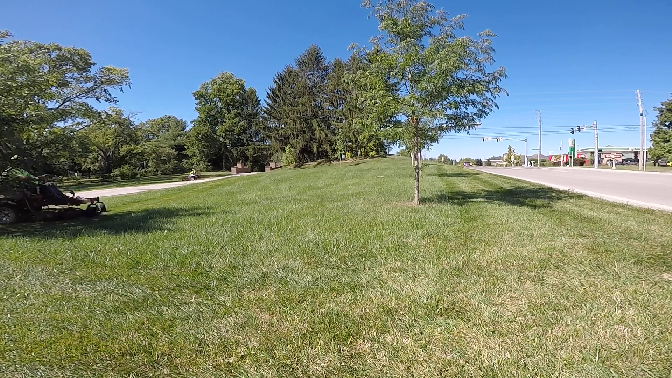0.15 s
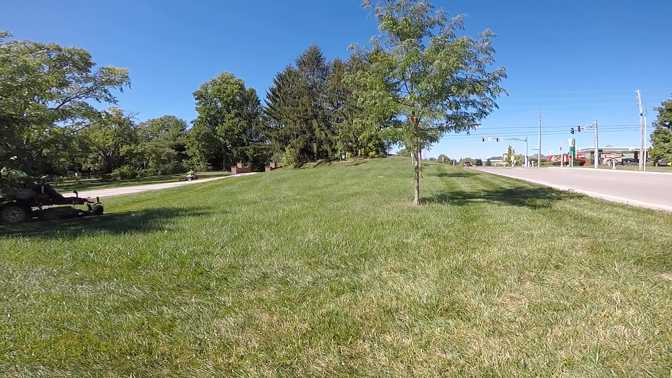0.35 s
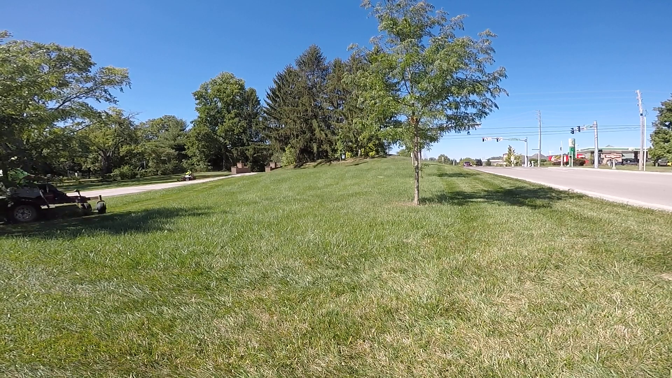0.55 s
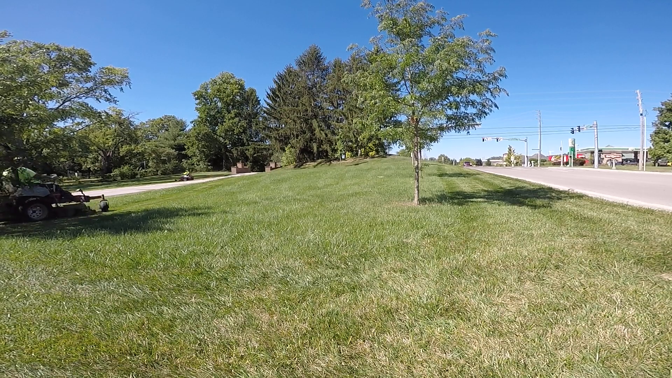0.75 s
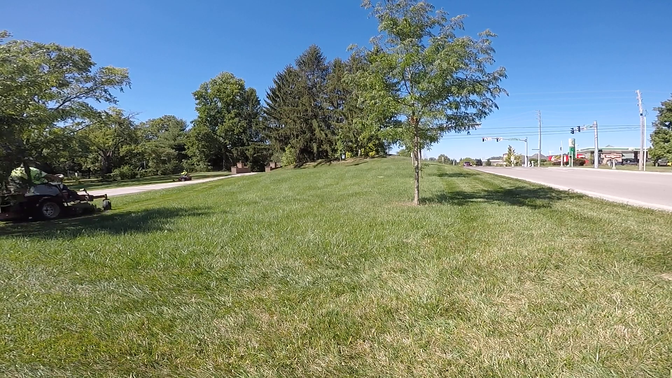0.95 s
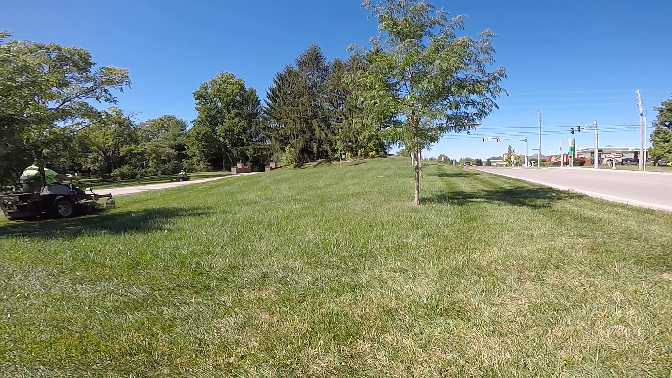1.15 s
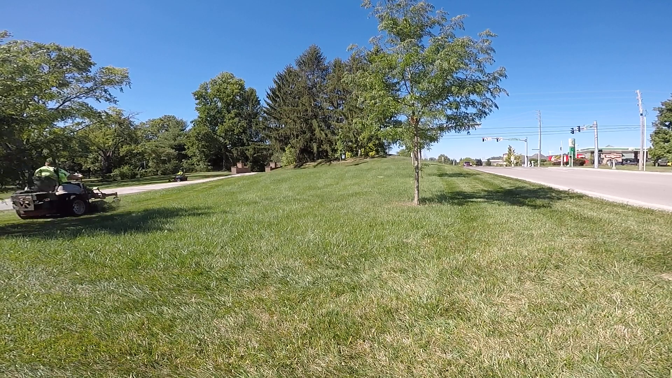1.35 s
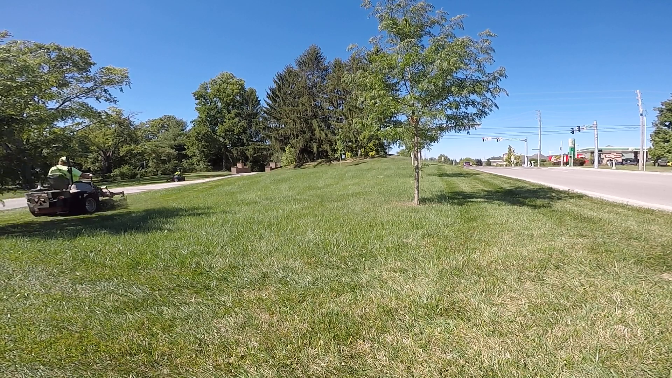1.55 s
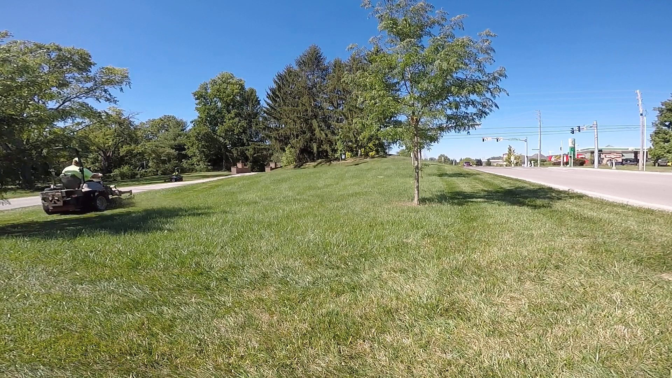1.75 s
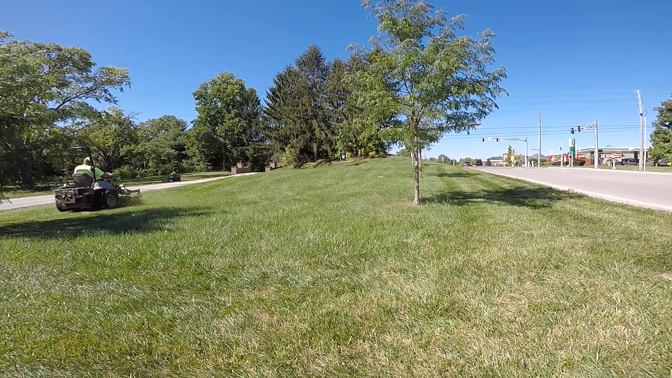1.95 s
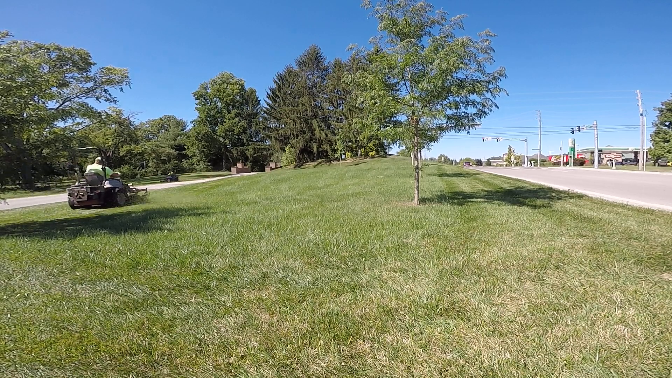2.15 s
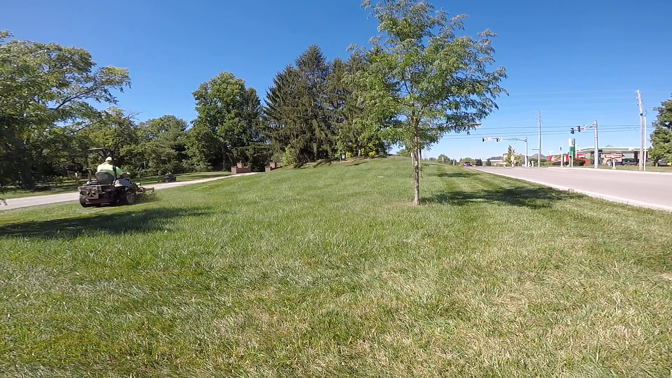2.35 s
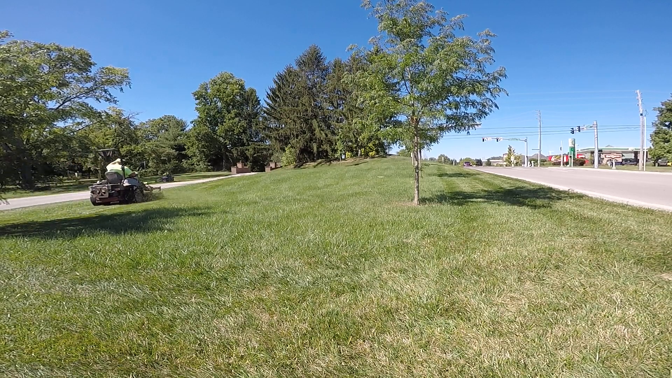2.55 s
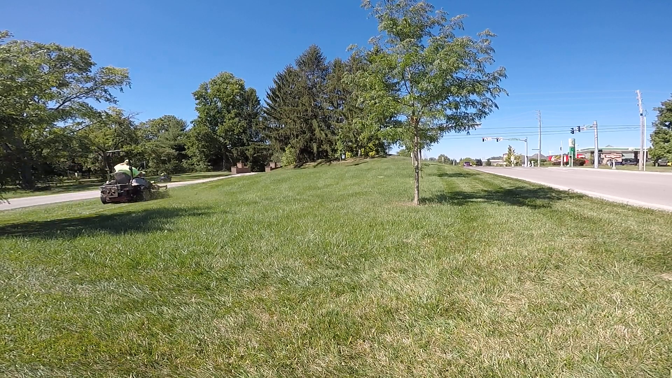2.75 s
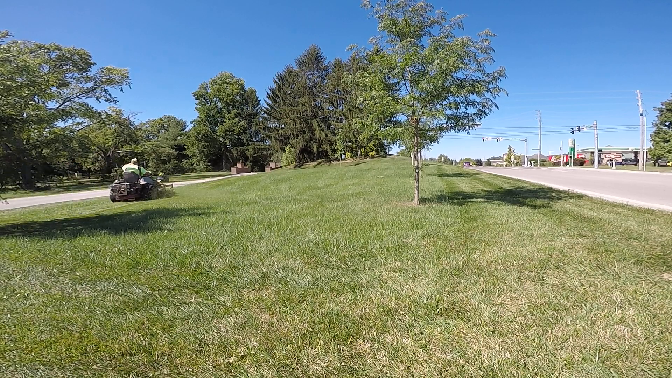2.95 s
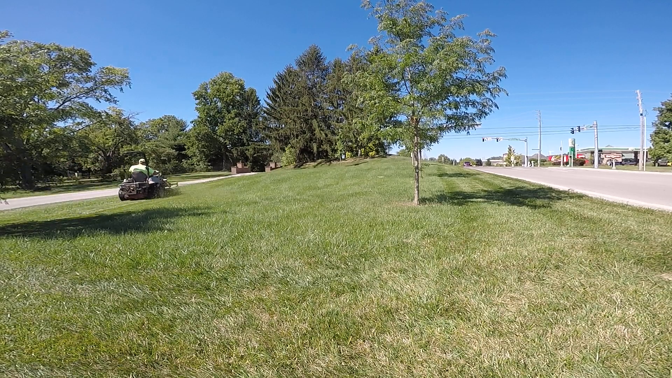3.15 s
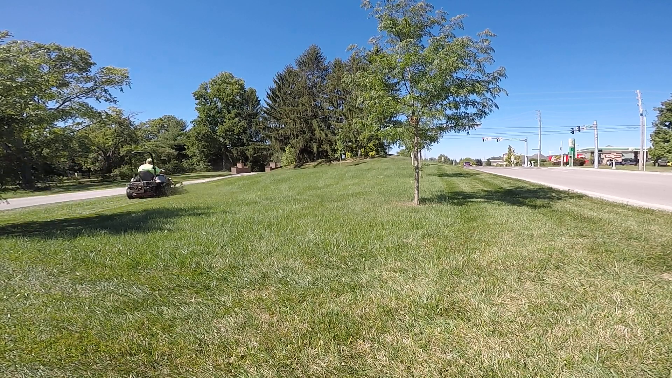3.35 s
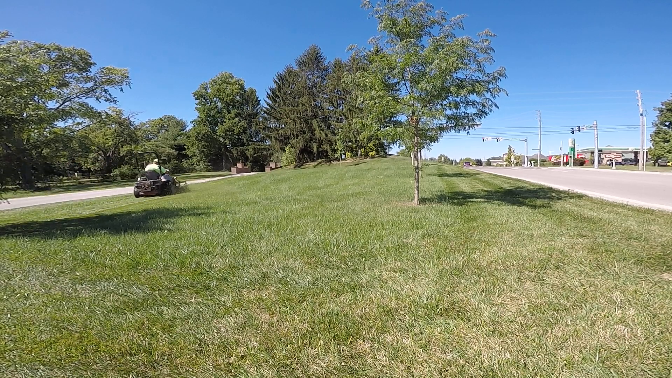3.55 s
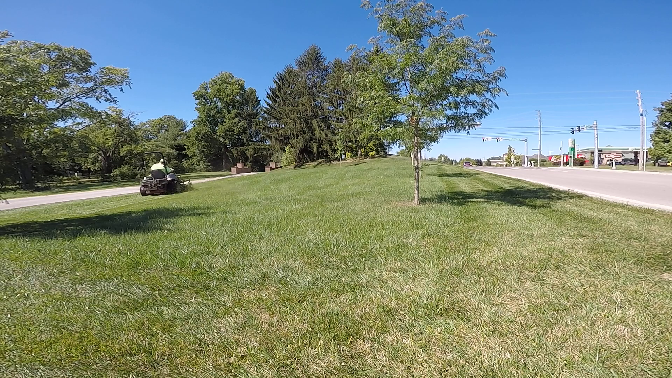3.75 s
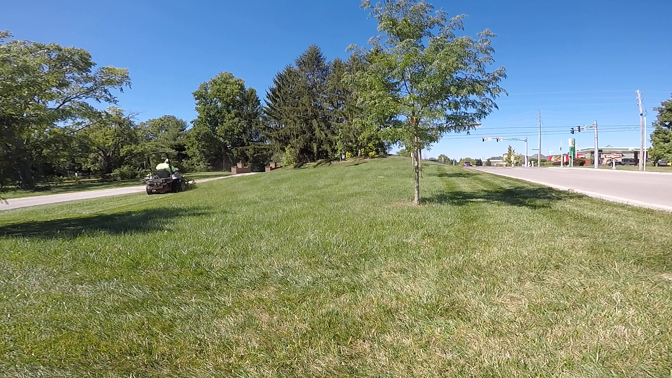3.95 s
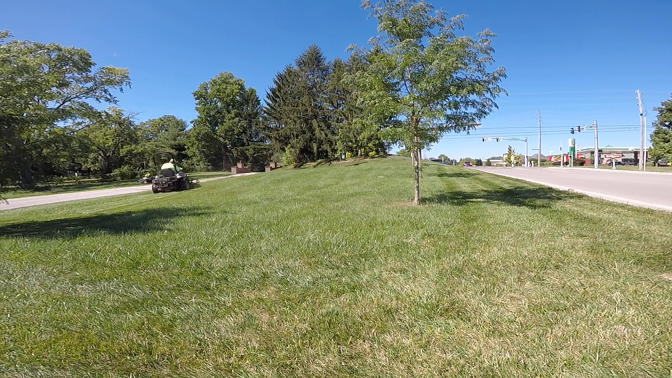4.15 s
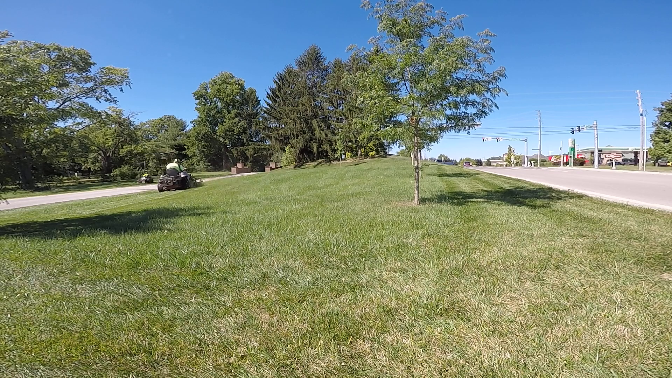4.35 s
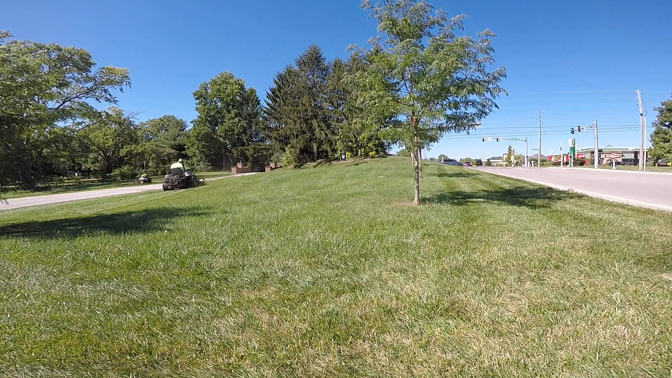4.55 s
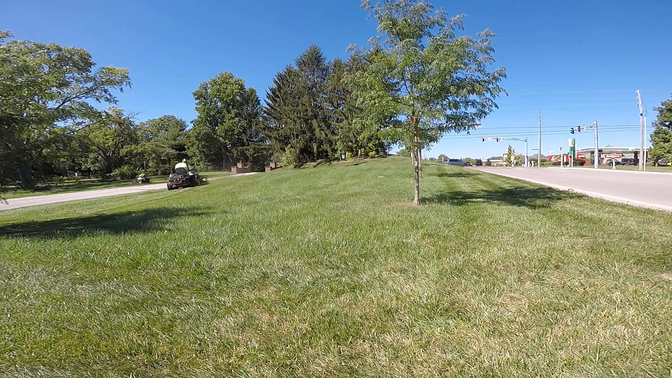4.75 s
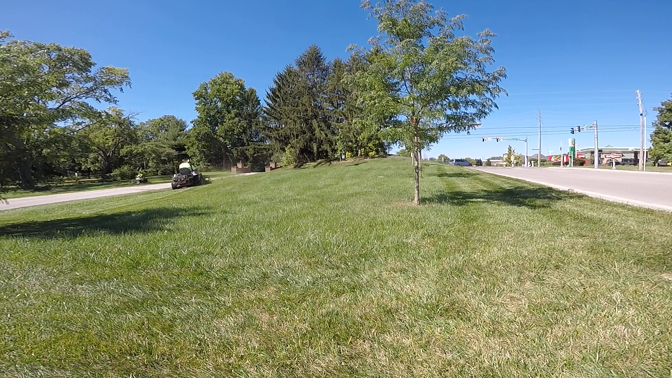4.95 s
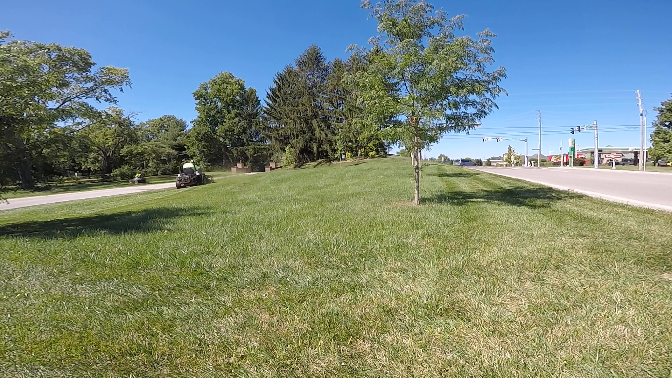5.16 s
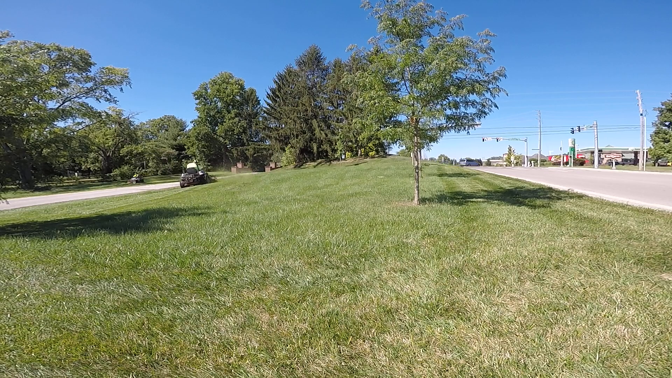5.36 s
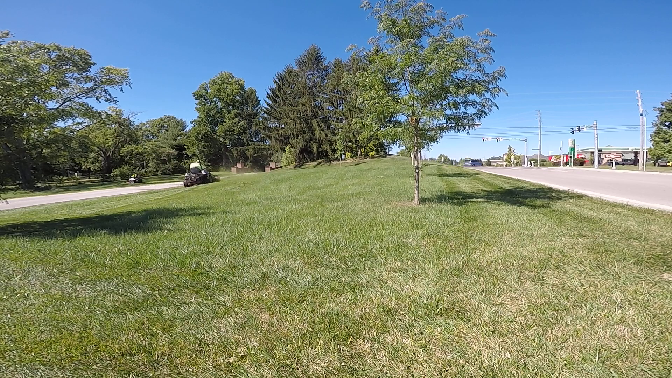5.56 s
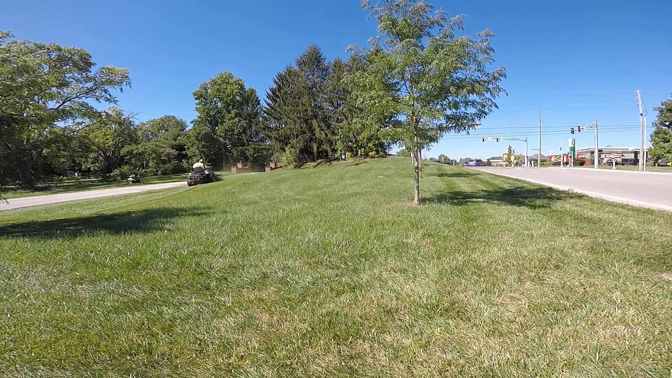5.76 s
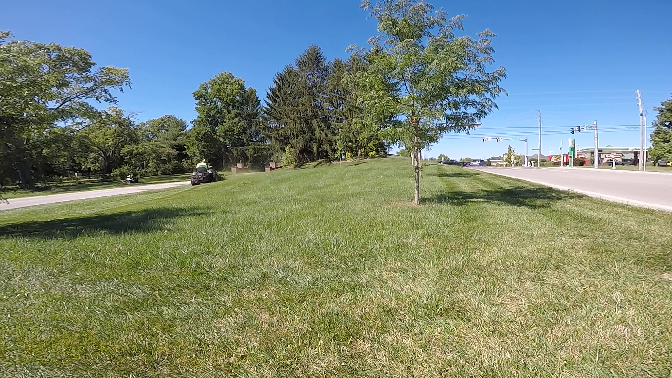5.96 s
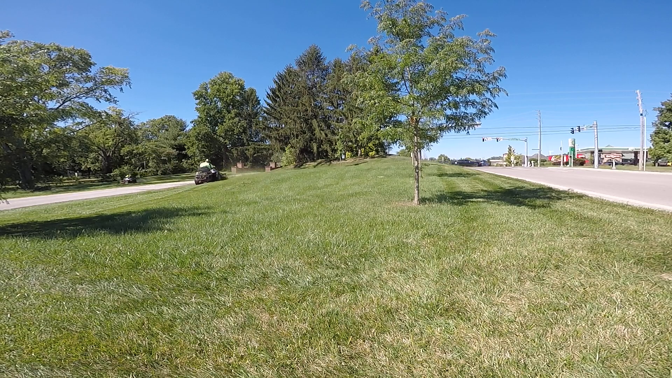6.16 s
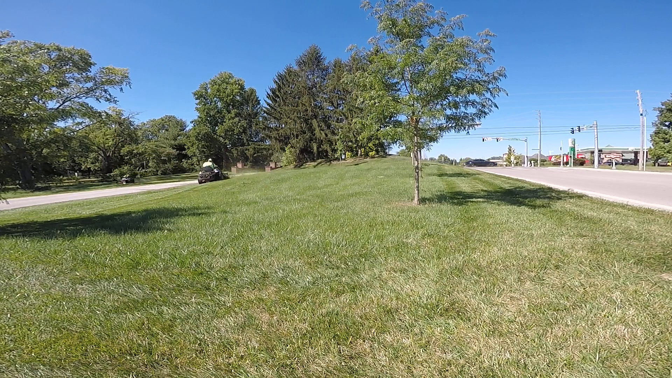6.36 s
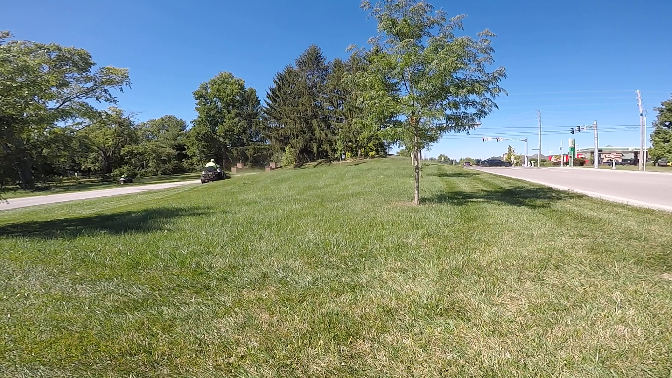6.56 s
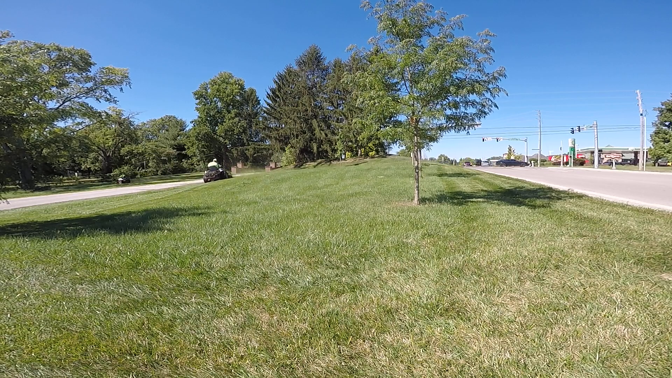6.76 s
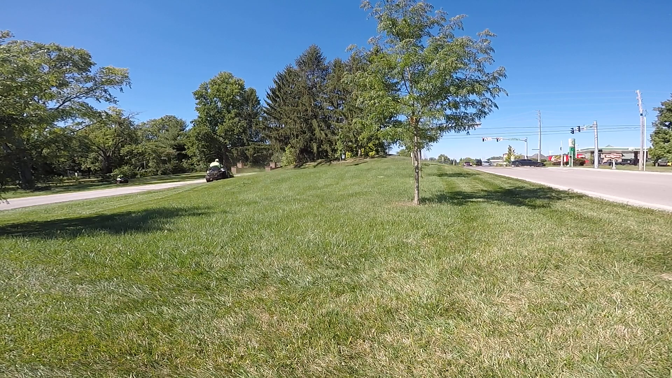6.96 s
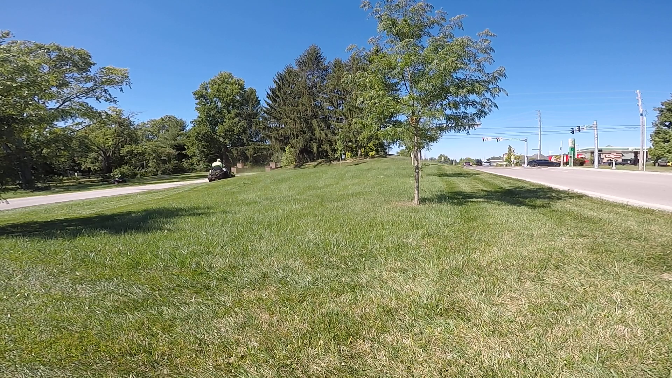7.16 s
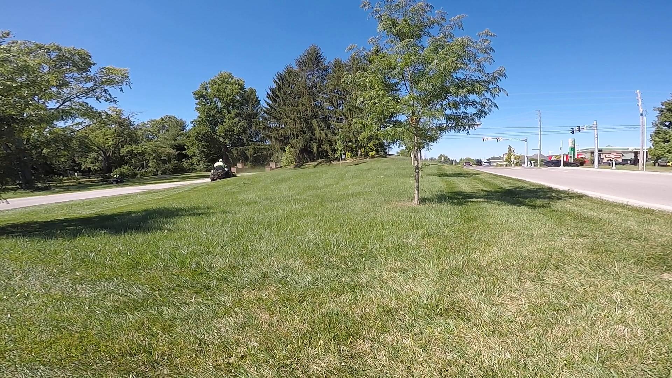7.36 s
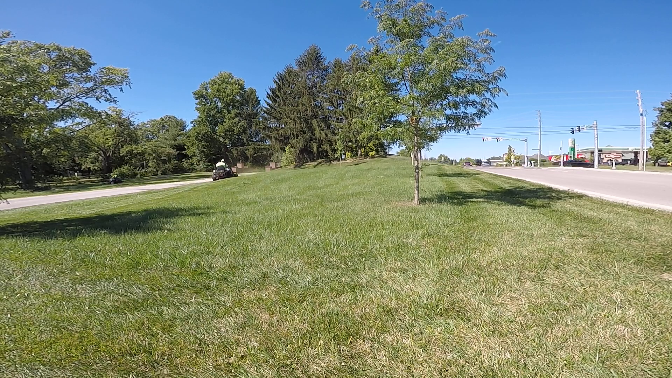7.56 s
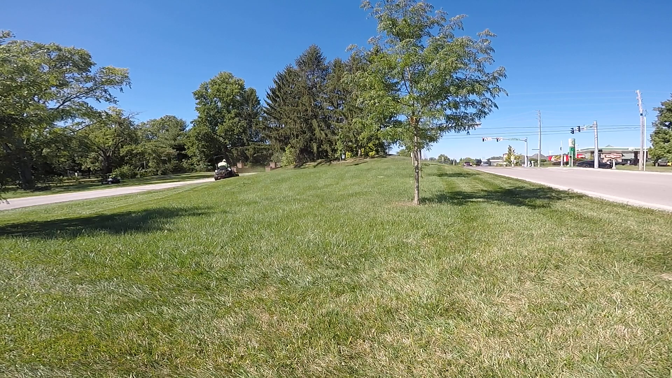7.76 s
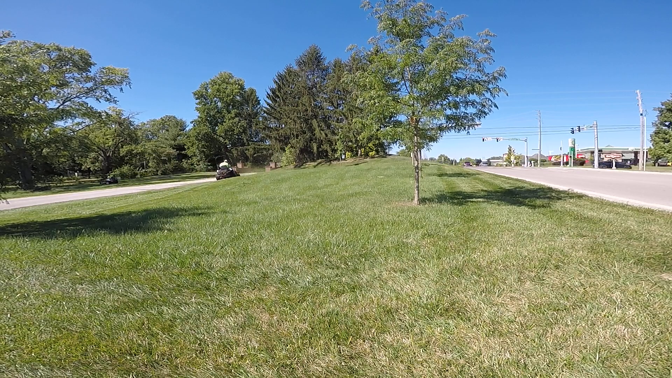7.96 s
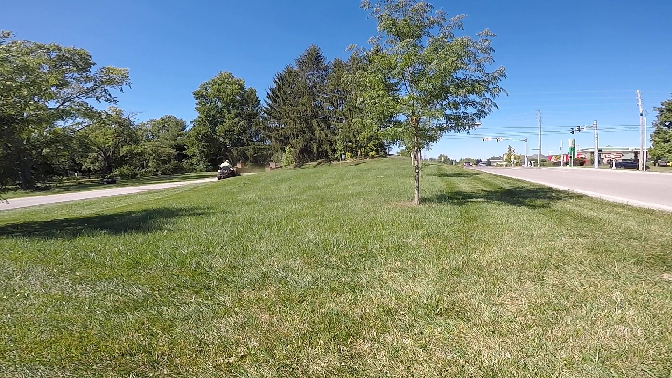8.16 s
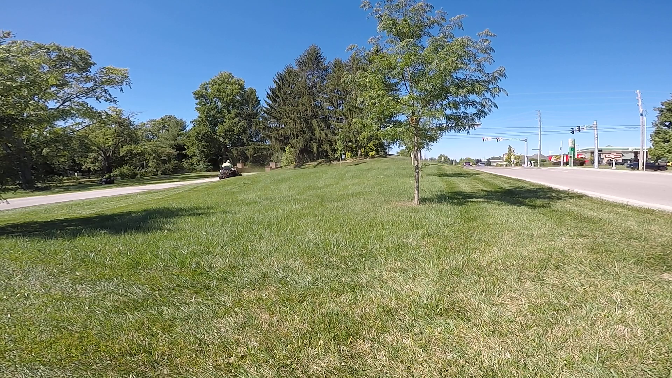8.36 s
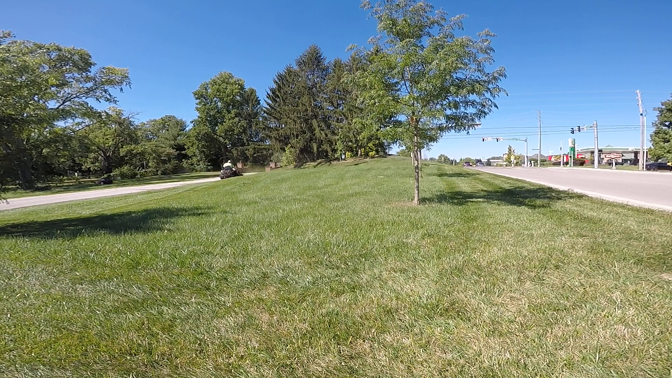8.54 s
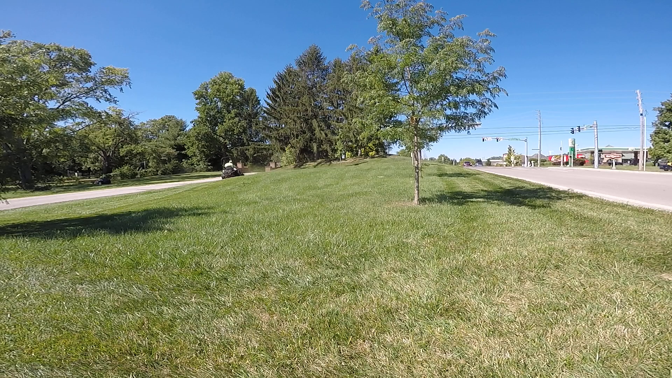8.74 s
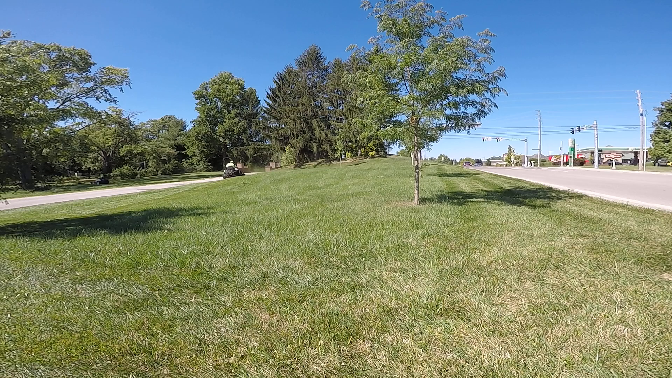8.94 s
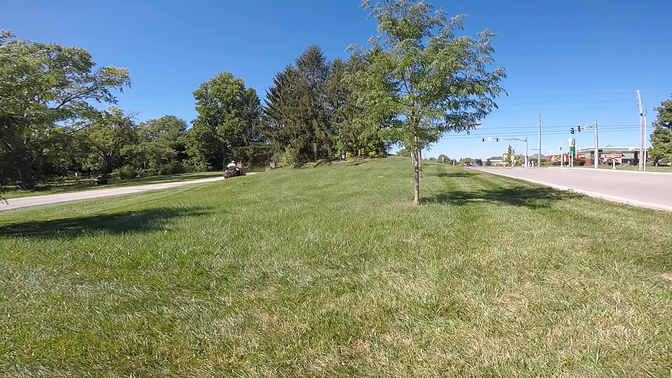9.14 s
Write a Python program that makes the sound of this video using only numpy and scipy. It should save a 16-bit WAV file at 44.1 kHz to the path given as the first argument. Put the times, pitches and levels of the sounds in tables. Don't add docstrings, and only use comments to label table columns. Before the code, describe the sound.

Low twin-cylinder mower drone and blade whirr swing away outdoors, gritty exhaust puffs rising then fading, with wind thumps and another mower's wavering hum behind.

```python
import sys
import numpy as np
from scipy import signal
from scipy.io import wavfile
from scipy.ndimage import uniform_filter1d

SR = 44100
rng = np.random.default_rng(int(sys.argv[2]) if len(sys.argv) > 2 else 0)


def inscribe(sig):
    pcm = np.round(np.clip(np.atleast_2d(sig).T, -1, 1) * 32767)
    wavfile.write(sys.argv[1], SR, pcm.astype(np.int16))


def level_to_linear(level):
    exponent = np.asarray(level, float) / 20
    return 10 ** exponent


N = 405719
TIME = np.arange(N) / SR
HZ = np.fft.rfftfreq(1024, 1 / SR)[:, None]
FRAMES = np.arange(-(-N // 256) + 1) * 256 / SR

# (time [s], speed [engine cycles/s, each two crank turns])
NEAR_SPEED = [(0.0, 26.646), (0.75, 27.599), (0.99, 27.117), (1.49, 25.492), (1.99, 25.391), (2.74, 26.468),
              (3.48, 26.01), (3.98, 25.465), (4.23, 25.663), (5.22, 25.561), (6.71, 26.253), (7.71, 26.313),
              (8.45, 26.778), (9.2, 26.93)]


def engine_cycles(speed):
    return np.cumsum(np.interp(TIME, *np.transpose(speed))) / SR


CYCLES = engine_cycles(NEAR_SPEED)

# (time [s], level [dB])
ENGINE = [(0, -24.5), (1.1, -26.5), (1.7, -20), (2.8, -22), (3.8, -20.5), (5.9, -21), (6.5, -24.5),
          (8.6, -25), (9.2, -29)]
# (engine order [number], level against order 5 [dB])
OTHER_ORDERS = [(1, -30), (4, -14), (6, -6.5), (7, -8.5), (8, -15), (9, -14), (10, -17.5), (11, -18),
                (12, -23.5), (13, -36)]
TURN_S, TURN_LENGTH_S = 1.4, 0.4
THIRD_DB, THIRD_SHADE_DB = -7.5, -3
SECOND_DB, SECOND_FADE_DB_PER_S = -22.5, 0.76


def engine():
    fifth_db = curves(ENGINE, TIME)[0]
    shaded = np.clip(1 - (TIME - TURN_S) / TURN_LENGTH_S, 0, 1)
    second_db = SECOND_DB - SECOND_FADE_DB_PER_S * TIME
    third_db = fifth_db + THIRD_DB + THIRD_SHADE_DB * shaded
    orders, db = np.transpose(OTHER_ORDERS)
    rest = [fifth_db + d - 0.12 * (k - 5) * (TIME - 4) for k, d in zip(orders, db)]
    levels = [second_db, third_db, fifth_db] + rest
    return tones(CYCLES, [2, 3, 5, *orders.round()], levels, waver_db=0.6, wobble=0.06)


# (multiple of blade pass [number], first spindle [dB], share of the others [ratio],
# lag of the second [turns], lag of the third [turns])
BLADES = [(1, -22, 1.33, 0.45, 0.16), (2, -22, 0.88, 0.098, 0.58), (3, -30, 0.88, 0.096, 0.67),
          (4, -27, 0.18, 0.5, 0.56), (5, -34.5, 0.63, 0.49, 0.42)]
# (multiple of blade pass [number], level against multiple 5 [dB])
SPINDLE = [(6, -19), (8, -6.5)]
BELT = 3.696
SLIP_PER_S, THIRD_SHARE = (-0.2447, -0.301), 0.9
FADE_DB_PER_S, FADE_PER_MULTIPLE = 0.33, 0.53


def blades():
    levels = []
    for k, db, share, *lags in BLADES:
        multiple = round(k)
        fading_db = db - (FADE_DB_PER_S + FADE_PER_MULTIPLE * multiple) * TIME
        levels.append(fading_db + beats(multiple, SLIP_PER_S, (share, share * THIRD_SHARE), lags))
    orders, db = np.transpose(SPINDLE)
    rest = [levels[-1] + d for d in db]
    multiples = [1, 2, 3, 4, 5, *orders.round()]
    return tones(BELT * CYCLES, multiples, levels + rest, waver_db=1.0, wobble=0.12)


def beats(multiple, slips, shares, lags):
    total = 1
    for slip, share, lag in zip(slips, shares, lags):
        total = total + share * np.exp(2j * np.pi * (multiple * slip * FRAMES + lag))
    return np.interp(TIME, FRAMES, 20 * np.log10(abs(total) + 1e-3))


# (place in the cycle [cycles], puff level [dB], fade [cycles])
FIRING = [
    (.055, 0, .14),
    (.41, -3.8, .11),
]


def puffs(strength_db):
    gate = np.zeros(N)
    for (place, db, fade), own_db in zip(FIRING, strength_db.T):
        since = (CYCLES - place) % 1
        puff = (1 - np.exp(-since / 0.037)) * np.exp(-since / fade)
        gate += level_to_linear(db + own_db[(CYCLES - place + 1).astype(int)]) * puff
    return gate ** 2 / np.mean(gate ** 2)


# (time [s], level over the hiss [dB])
CRACKS = [(0.522, 8.4), (1.452, 8.7), (1.649, 12), (1.689, 11), (1.807, 10), (1.885, 6), (1.924, 8.2),
          (2.354, -1), (2.432, 3), (2.471, 6), (2.662, 6), (2.811, 6), (3.575, 9.2), (3.885, 13),
          (4.081, 13), (4.161, 5), (4.353, 15), (4.393, 11), (4.552, 3), (4.705, 9), (4.861, 12),
          (5.018, 4), (5.056, 11.0), (6.454, 9.8), (6.604, 7), (6.644, 5), (7.104, 9.1), (8.315, 11)]
CRACK, CRACK_SPREAD_DB, CRACK_LIFT_DB = 1.9, 5, -1.5
CRACK_PLACE, CRACK_FADE = 0.048, 0.04


def cracks():
    own_db = CRACK_SPREAD_DB * rng.standard_normal(300)
    s, db = np.transpose(CRACKS)
    own_db[(np.interp(s, TIME, CYCLES) + 1).astype(int)] = db + CRACK_LIFT_DB
    since = (CYCLES - CRACK_PLACE) % 1
    return CRACK * level_to_linear(own_db[(CYCLES - CRACK_PLACE + 1).astype(int)]) * np.exp(-since / CRACK_FADE)


# (time [s], hiss level [dB], brightness [dB], share in puffs [0-1])
EXHAUST = [(0.0, -38, -7.5, 0.6), (0.56, -40.5, -7.5, 1), (0.89, -36.5, -7.5, 0.44),
           (1.61, -28.5, -8, 0.66), (3.02, -29, -11.5, 0.59), (3.3, -26.5, -11, 0.51),
           (4.99, -26, -12.5, 0.49), (5.33, -26, -10.5, 0.44), (6.82, -30, -10.5, 0.49),
           (7.46, -34.5, -8, 0.26), (8.15, -33, -7.5, 0.23), (9.07, -34.5, -7, 0.33), (9.2, -34.5, -7, 0.4)]
# (time [s], level [dB])
POPS = [(1.2602, -15.5), (1.7676, -15.5), (1.9621, -16), (2.9988, -18.5), (3.344, -17), (3.6518, -16.5),
        (3.806, -14.5), (3.8449, -17.5), (3.9631, -18), (4.0414, -15), (4.1996, -19.5), (4.3532, -13),
        (4.5114, -17.5), (4.7039, -21), (4.9778, -14.5), (5.094, -12.5), (5.3305, -17), (5.4083, -15.5),
        (5.4866, -15.5), (5.527, -17), (5.6837, -17), (5.9516, -15), (6.3352, -17), (6.6819, -20)]
# (frequency [Hz], level [dB])
EXHAUST_COLOUR = [(300, -73), (700, -2.5), (1200, 2), (2500, -1.5), (4000, 0), (8000, 0.5), (11000, -0.5),
                  (14100, 10), (14600, -14)]


def exhaust():
    shared, low, high = rng.standard_normal((300, 2, 3)).transpose(2, 0, 1)
    s, db = np.transpose(POPS)
    shared[(np.interp(s, TIME, CYCLES) + 1).astype(int), 0] = db + 18.5
    share = np.clip(curves(EXHAUST, TIME)[2], 0, 1)
    noise = rng.standard_normal((2, N))
    dull_power = 1 - 0.38 * share + 0.24 * share * puffs(shared + 0.65 * low)
    sharp_power = 1 - share + share * puffs(shared + 1.9 * high)
    snaps = np.sqrt(share) * cracks() * signal.lfilter([1, -2, 1], 1, noise)
    dull = spectra(np.sqrt(dull_power) * noise)
    sharp = spectra(np.sqrt(sharp_power) * noise + snaps)
    treble = np.clip(np.log2(HZ / 900 + 1e-9) / 2.07, 0, 1)
    level_db, bright_db, _ = curves(EXHAUST, FRAMES)
    tilt = np.clip(np.log2(HZ / 3000 + 1e-9), 0, 1.6)
    field_db = read(EXHAUST_COLOUR, HZ) + level_db + 12.5 + tilt * (bright_db + 8.5)
    field_db = field_db + patches(size=9, patchy_db=0.86)
    return ((1 - treble) * dull + treble * sharp) * level_to_linear(field_db)


# (time [s], roar level [dB], extra above 500 Hz [dB])
DECK = [(0.0, -22.5, -9.5), (0.05, -18.5, -11.5), (1.1, -21.5, -10), (1.33, -21, -12), (2.46, -22.5, -13),
        (2.66, -21.5, -14), (6.53, -28.5, -20.5), (9.1, -34, -11.5), (9.2, -31, -20)]
# (frequency [Hz], level [dB])
DECK_COLOUR = [(15, -25), (40, -1.5), (90, -1), (200, -2.5), (320, -5), (450, -11), (700, -7),
               (1500, -12.5), (4000, -21)]


def deck():
    throb = 1 + 0.12 * np.cos(2 * np.pi * BELT * CYCLES)
    level_db, upper_db = curves(DECK, FRAMES)
    tilt = np.clip(np.log2(HZ / 350 + 1e-9), 0, 1)
    low = np.clip(np.log2(250 / (HZ + 1)), 0, 1) * 0.89 * (FRAMES - 4)
    field_db = read(DECK_COLOUR, HZ) + level_db + 19.0 + low + tilt * (upper_db + 11.5)
    field_db = field_db + patches(size=6, patchy_db=1.0)
    return spectra(throb * rng.standard_normal((2, N))) * level_to_linear(field_db)


# (time [s], speed [engine cycles/s])
FAR_SPEED = [(0.0, 27.698), (0.25, 28.451), (1.24, 28.077), (1.99, 27.149), (2.24, 27.114), (3.23, 28.612),
             (3.98, 26.963), (4.48, 28.405), (5.72, 27.965), (5.97, 27.244), (6.46, 26.92), (7.21, 28.424),
             (7.96, 27.719), (8.45, 28.438), (8.95, 27.567), (9.2, 27.726)]
# (time [s], level [dB])
FAR = [
    (0, -28),
    (3.3, -42),
    (5.5, -31),
    (6.5, -28.5),
    (8.2, -31),
    (9.2, -29),
]
# (engine order [number], level against order 5 [dB])
FAR_ORDERS = [(1, -31), (3, -3.5), (4, -14), (6, -6), (7, -7.5), (8, -12)]
# (time [s], level [dB])
FAR_PUFFS = [(0, -58), (5, -53), (6.5, -46), (7.5, -35), (8.2, -40), (8.6, -46), (9.2, -40)]
FAR_CYCLES = engine_cycles(FAR_SPEED)
FAR_SECOND_DB, LUG_DB_PER_HZ, FAR_IDLE_HZ = 1, 7, 27.47
FAR_BLADE_DB, FAR_BLADE_RISE_DB_PER_S = -31, 0.5
FAR_SLIP_PER_S, FAR_SHARE, FAR_LAG = -0.274, 0.6, 0.17


def far_mower():
    fifth_db = curves(FAR, TIME)[0]
    lug_hz = curves(FAR_SPEED, TIME)[0] - FAR_IDLE_HZ
    second_db = fifth_db + FAR_SECOND_DB - LUG_DB_PER_HZ * lug_hz
    orders, db = np.transpose(FAR_ORDERS)
    levels = [second_db, fifth_db] + [fifth_db + d for d in db]
    motor = tones(FAR_CYCLES, [2, 5, *orders.round()], levels, waver_db=0.8, wobble=0.08)

    blade_db = FAR_BLADE_DB + FAR_BLADE_RISE_DB_PER_S * TIME
    blade_db = blade_db + beats(1, [FAR_SLIP_PER_S], [FAR_SHARE], [FAR_LAG])
    levels = [blade_db, blade_db - 11.5, blade_db - 18.5]
    tips = tones(BELT * FAR_CYCLES, range(1, 4), levels, waver_db=0.83, wobble=0.1)

    since = (FAR_CYCLES - 0.615) % 1
    own_db = 3.5 * rng.standard_normal(300)[(FAR_CYCLES + 0.385).astype(int)]
    thin = signal.butter(2, [6300, 10500], "band", fs=SR, output="sos")
    hiss = signal.sosfilt(thin, rng.standard_normal(N))
    tick = (1 - np.exp(-since / 0.02)) * np.exp(-since / 0.054)
    return motor + tips + level_to_linear(curves(FAR_PUFFS, TIME)[0] + own_db + 15.0) * tick * hiss


# (time [s], level [dB])
GUSTS = [
    (.1, -26),
    (.43, -22),
    (3.2, -38),
    (3.45, -33),
    (4.59, -35),
    (5.1, -21),
    (5.84, -31),
]
CALM_DB, BUILD_S, DROP_S = -37, 0.18, 0.06


def wind():
    rumble = signal.butter(2, [14, 38], "band", fs=SR, output="sos")
    lumps = signal.sosfilt(rumble, rng.standard_normal((2, N)))
    force = level_to_linear(CALM_DB)
    for s, db in GUSTS:
        away = np.maximum((s - TIME) / BUILD_S, (TIME - s) / DROP_S)
        force = force + level_to_linear(db) * np.exp(-away)
    return force * evened(lumps[0] + 0.52 * lumps[1] * np.array([[1], [-1]]))


# (frequency [Hz], level [dB])
LEFT = [(40, -0.5), (140, -1), (330, -3), (517, -10), (1895, 2), (2412, 0.86), (3531, -4.5), (4134, -7.5),
        (5340, -11.5), (7752, -9), (8010, -10.5), (9475, -10), (11628, -25), (14212, -40.5)]
RIGHT = [(40, 0.5), (400, 5.5), (947, -8), (1550, -5.5), (2153, -8.5), (2498, -0.5), (2842, -15),
         (3101, -2.5), (4307, -12), (4737, -7.5), (6546, -6.5), (7752, -6), (9475, -11), (14212, -47.5)]
# (frequency [Hz], width [Hz], level [dB])
LEFT_MODES = [(1534, 48, 3.5), (2116, 86, -6), (2670, 65, -6), (4150, 240, -13), (4800, 130, -11),
              (7730, 140, 2), (7660, 140, 1.5)]
RIGHT_MODES = [(846, 32, -4), (1300, 37, -13), (2250, 130, -13), (5540, 69, -9), (6750, 175, -9.5),
               (7900, 170, 4.5)]
# (frequency [Hz], width [Hz], level [dB])
AHEAD_DIP = [(4750, 240, 2), (7950, 200, -10)]
# (frequency [Hz], lead [radians])
LEAD_SIDE = [(431, 0.3), (689, 1.77), (1895, 2.05), (2412, 1.14), (3273, 6.31), (3876, 6.53), (4221, 8.36),
             (4823, 7.97), (6460, 9.49), (9561, 10.85), (11370, 12.53), (12489, 12.42), (14556, 12.93),
             (14729, 15.67)]
LEAD_AHEAD = [(431, 0.14), (861, 1.95), (2153, 1.59), (2239, 0.27), (2498, 0.7), (2842, 5.06), (3359, 6.64),
              (3790, 6.37), (4134, 8.0), (4651, 7.62), (4996, 8.8), (6288, 9.3), (9216, 9.47),
              (14729, 9.21)]
# (frequency [Hz], likeness [0-1])
ALIKE = [(431, 0.78), (1637, 0.99), (2153, 0.63), (2929, 0.93), (3704, 0.96), (4048, 0.7), (4479, 0.97),
         (5860, 0.67), (6560, 1), (7200, 0.65), (7838, 0.79), (8699, 0.71), (11714, 0.98), (13954, 0.7),
         (14729, 0.9)]
# (time [s], bearing [0 beside to 1 ahead])
BEARING = [
    (0, 0.033),
    (1.5, 0.13),
    (3, 0.52),
    (5, 1),
    (9.2, 0.91),
]


def ports(direct, scattered):
    ahead = np.clip(curves(BEARING, FRAMES)[0], 0, 1)
    upper = np.clip(HZ / 430, 0, 1)
    lead = upper * ((1 - ahead) * read(LEAD_SIDE, HZ) + ahead * read(LEAD_AHEAD, HZ))
    alike = np.clip(1 - (1 - read(ALIKE, HZ)) * upper ** 2, 0, 1)
    right = alike * direct * np.exp(-1j * lead) + np.sqrt(1 - alike ** 2) * scattered
    left_db = read(LEFT, HZ) + bumps(LEFT_MODES)
    right_db = read(RIGHT, HZ) + bumps(RIGHT_MODES) + ahead * bumps(AHEAD_DIP)
    pair = np.array([direct * level_to_linear(left_db), right * level_to_linear(right_db)])
    return signal.istft(pair, nperseg=1024, noverlap=768)[1][:, :N]


def bumps(modes):
    return sum(db * np.exp(-((HZ - hz) / width) ** 2) for hz, width, db in modes)


def tones(turns, orders, levels_db, waver_db, wobble):
    out = np.zeros(N)
    for k, db in zip(orders, levels_db):
        phase = 2 * np.pi * (k * turns + rng.random()) + wobble * drift(hz=7.6)
        out += np.sqrt(2) * level_to_linear(db + waver_db * drift(hz=12)) * np.cos(phase)
    return out


def drift(hz):
    return np.interp(TIME * hz, np.arange(2000), rng.standard_normal(2000))


def patches(size, patchy_db):
    field = rng.standard_normal((len(FRAMES), 513)).T
    smooth = uniform_filter1d(uniform_filter1d(field, size, axis=0), size, axis=1)
    return patchy_db * evened(smooth)


def curves(rows, t):
    s, *columns = np.transpose(rows)
    return [np.interp(t, s, c) for c in columns]


def read(points, hz):
    f, value = np.transpose(points)
    return np.interp(np.log(hz + 1), np.log(f + 1), value)


def evened(x):
    return x / np.sqrt(np.mean(x ** 2) + 1e-20)


def spectra(x):
    return signal.stft(x, nperseg=1024, noverlap=768)[2]


def scene():
    direct, scattered = exhaust() + deck()
    pitched = engine() + blades() + far_mower()
    return ports(direct + spectra(pitched), scattered) + wind()


def roll_off(x):
    return signal.sosfilt(signal.butter(12, 15190, fs=SR, output="sos"), x)


def record(dry):
    ceiling = 0.99
    mix = ceiling * np.tanh(dry / ceiling)
    return roll_off(mix)


dry = scene()
out = record(dry)
inscribe(out)
```